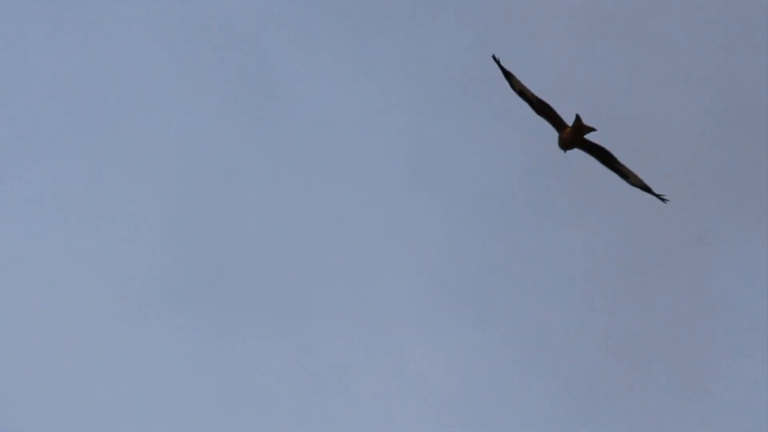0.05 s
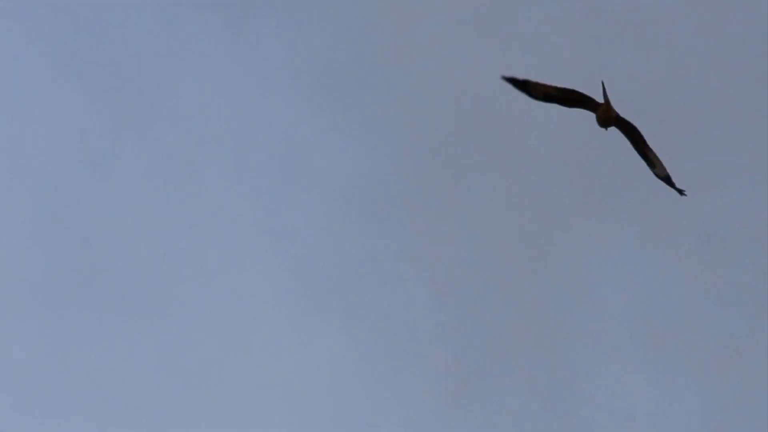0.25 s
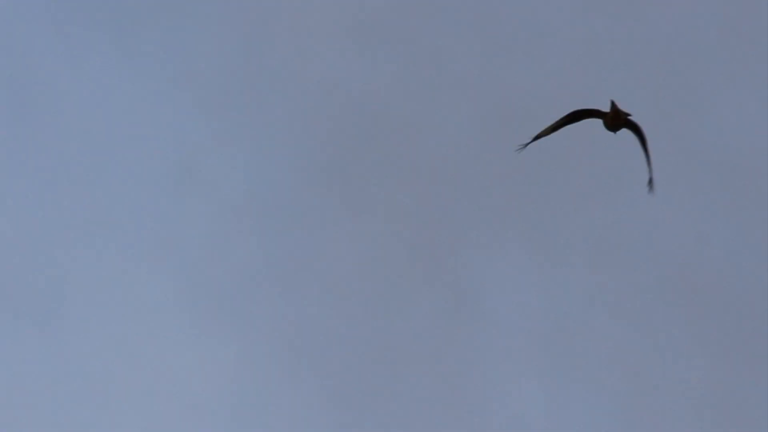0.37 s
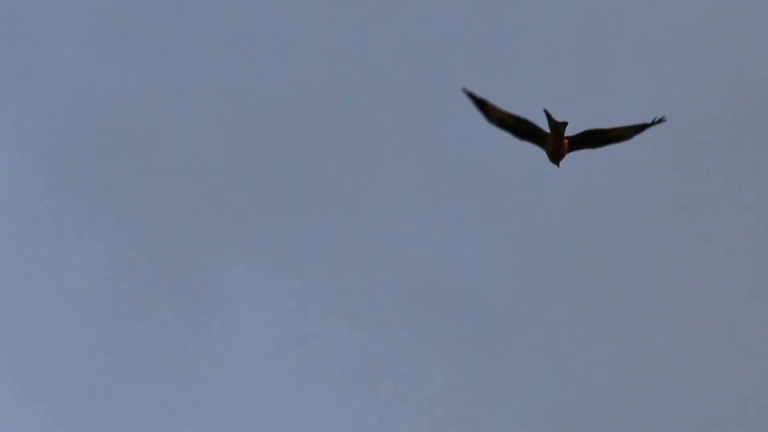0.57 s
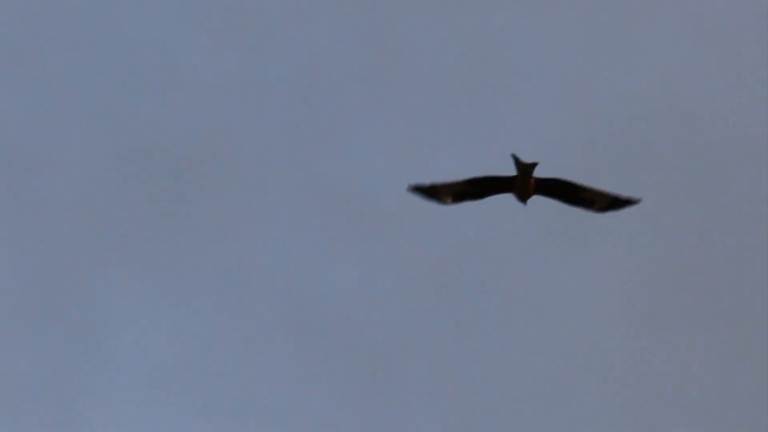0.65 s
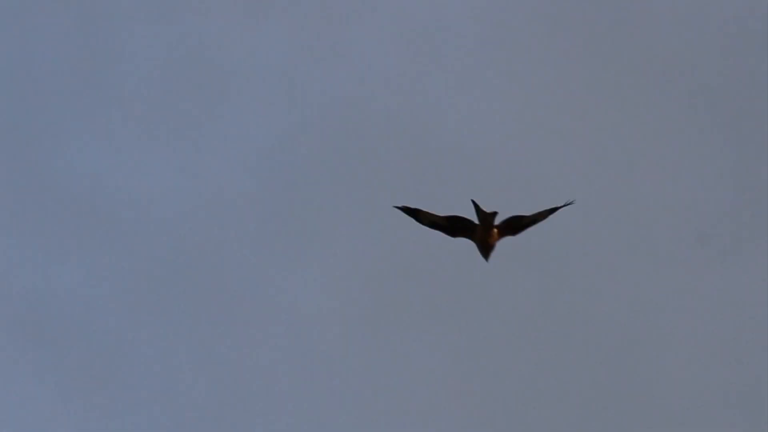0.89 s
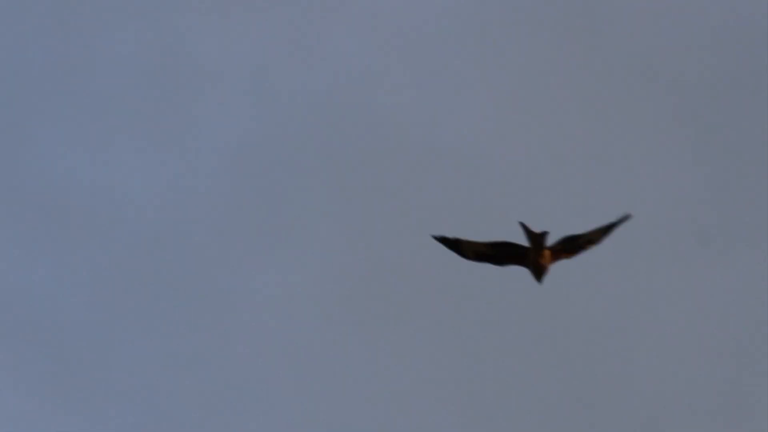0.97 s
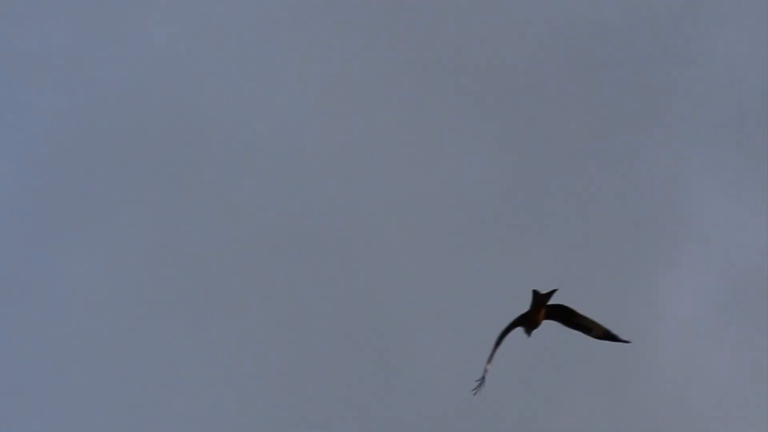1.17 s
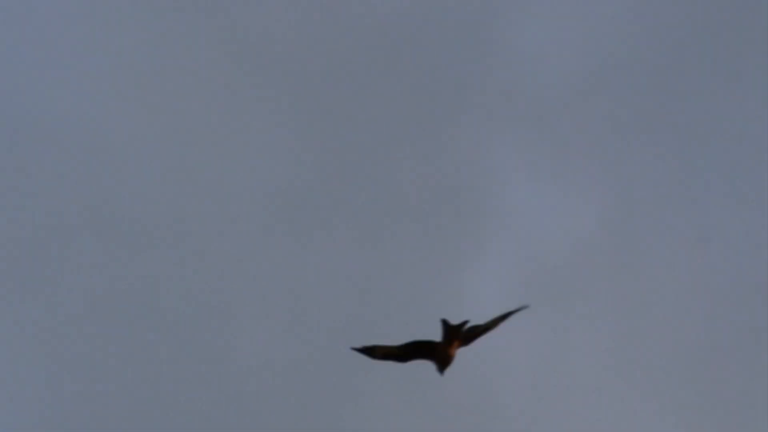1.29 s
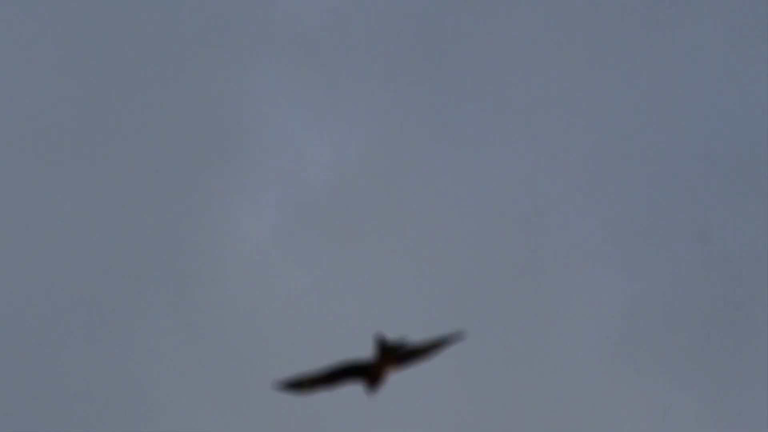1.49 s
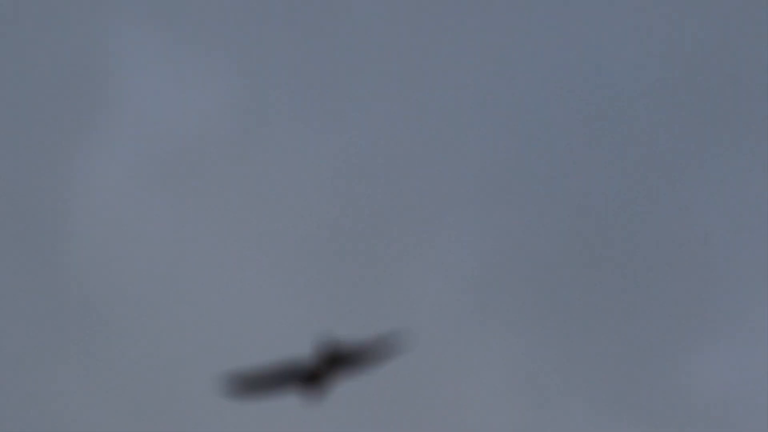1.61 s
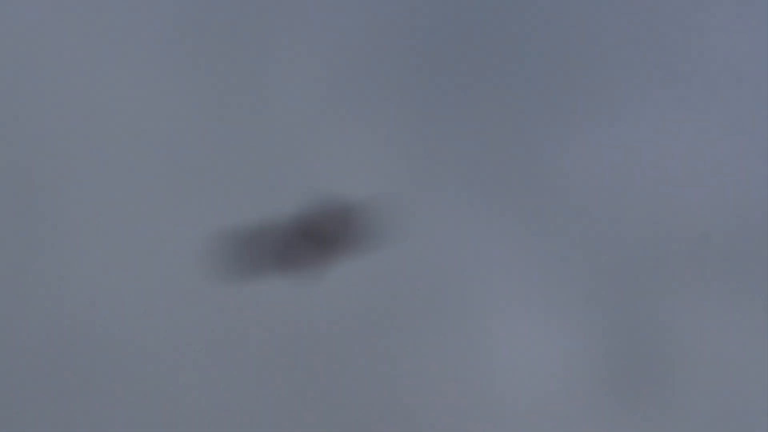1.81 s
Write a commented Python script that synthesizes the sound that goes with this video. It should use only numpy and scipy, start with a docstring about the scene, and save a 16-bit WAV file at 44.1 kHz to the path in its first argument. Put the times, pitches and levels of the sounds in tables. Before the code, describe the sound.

Gusty wind buffets the microphone, rumbling and thumping over a faint hiss of distant air.

```python
"""Gusty wind buffets a camera's microphones; stereo widening puts left and right largely in opposite phase.
Turbulence throbs and rumbles, then flutters and rasps as it hardens; single eddies thump.
Behind it distant air hisses and wind moans and whistles round an edge, with one soft brush and a tick.
The hardest buffets overload the recorder, whose gain control ducks the hiss and lets it swell back."""
import sys
import numpy as np
from scipy import signal
from scipy.fft import rfft, irfft
from scipy.io import wavfile
from scipy.ndimage import minimum_filter1d

SR = 44100
rng = np.random.default_rng(int(sys.argv[2]) if len(sys.argv) > 2 else 0)


def wrap_up_sound(samples):
    """Save the sound to the file named by the first command line argument, as 16-bit audio."""
    columns = np.atleast_2d(samples).T
    # keep every value between -1 and 1, then stretch to whole-number steps
    tamed = np.clip(columns, -1, 1)
    steps = np.round(tamed * 32767).astype(np.int16)
    wavfile.write(sys.argv[1], SR, steps)


N = 81585
TIME_S, BINS_HZ = np.arange(N) / SR, np.fft.rfftfreq(N, 1 / SR)
WIND_CORRELATION = -0.63  # stereo widening leaves the channels largely in opposite phase


def amp(db):
    """Decibels to gain."""
    return 10 ** (np.asarray(db) / 20)


def unit_rms(x):
    """Scales to rms 1."""
    return x / np.sqrt(np.mean(x ** 2) + 1e-20)


def over_hz(points):
    """Table value at each bin, interpolated in log frequency."""
    hz, value = np.transpose(points)
    return np.interp(np.log(BINS_HZ + 1), np.log(hz + 1), value)


def over_time(rows):
    """Table columns interpolated at each sample."""
    time_s, *columns = np.transpose(rows)
    return [np.interp(TIME_S, time_s, column) for column in columns]


def pan(left_minus_right_db):
    """Left and right gains."""
    return amp(np.array([[1], [-1]]) * left_minus_right_db / 2)


def blur(x, width_s):
    """Gaussian smoothing, sigma = width_s / pi."""
    return irfft(rfft(x) * np.exp(-2 * (BINS_HZ * width_s) ** 2), N)


def lag(x, tau_s):
    """One-pole follower."""
    pole = np.exp(-1 / (tau_s * SR))
    return signal.lfilter([1 - pole], [1, -pole], x)


def wander(width_s):
    """Smooth random curve, rms 1."""
    return unit_rms(blur(rng.standard_normal(N), width_s))


def noise(bin_gain, correlation):
    """Stereo noise of given spectrum and left-right correlation, rms 1."""
    left, independent = rfft(rng.standard_normal((2, N)))
    right = correlation * left + np.sqrt(1 - correlation ** 2) * independent
    return unit_rms(irfft(np.array([left, right]) * bin_gain, N))


def steadied(x, width_s=0.028):
    """Divides out a noise's slow chance swells."""
    power = blur((x ** 2).mean(0), width_s)
    return x / np.sqrt(abs(power) + 1e-9)


# Hiss spectrum: freq_hz, density_db
AIR_SPECTRUM = [(40, 1.5), (150, -9.5), (400, -7.5), (700, -13.5), (1100, -7.5), (1600, -8.5),
                (2400, -16.5), (3400, -16.5), (4500, -22.5), (7000, -28), (11000, -33), (16000, -39.5)]
# Hiss left-right likeness: freq_hz, correlation
AIR_CORRELATION = [(100, 0.98), (1300, 0.78), (3000, 0.25), (6000, 0.035), (15000, -0.23)]
# Hiss balance: freq_hz, pan_db
AIR_BALANCE = [(200, 2), (1200, 0.5), (2400, -1.5), (6000, -1.5), (15000, -1.5)]
def distant_air(level_db=-46):
    """Smooth hiss of wind far away."""
    bin_gain = amp(over_hz(AIR_SPECTRUM)) * pan(over_hz(AIR_BALANCE))
    return amp(level_db) * noise(bin_gain, over_hz(AIR_CORRELATION))


# Scuff spectrum: freq_hz, density_db
BRUSH_SPECTRUM = [(1000, -20), (3000, 5), (6000, 4), (10000, -7), (16000, -14)]
def brush(centre_s=0.531, half_width_s=0.013, level_db=-55.5, pan_db=-2):
    """A light touch scuffs the camera."""
    swell = np.exp(-((TIME_S - centre_s) / half_width_s) ** 2)
    return amp(level_db) * swell * noise(amp(over_hz(BRUSH_SPECTRUM)), correlation=0) * pan(pan_db)


# Modes of a small hard tick: freq_hz, level_db, t60_s
TICK_MODES = [(1740, -30, 0.028), (1880, -37.5, 0.035), (2360, -31, 0.01), (8540, -50, 0.0069)]
def tick(start_s=1.541, rise_s=0.0011):
    """A few modes ring and die quickly."""
    age_s = np.maximum(TIME_S - start_s, 0)
    ring = sum(amp(level_db - 60 * age_s / t60_s) * np.sin(2 * np.pi * freq_hz * age_s)
               for freq_hz, level_db, t60_s in TICK_MODES)
    return (1 - np.exp(-age_s / rise_s)) * ring


# Wind singing round an edge: time_s, pitch_hz, moan_db, whistle_db
EDGE_TONE = [(0, 1049, -55, -54.5), (.17, 1131, -49.5, -53.5), (.37, 1146, -52.5, -49.5),
             (.55, 1030, -51.5, -60), (.78, 1078, -51.5, -60), (.9, 1193, -43, -71), (.95, 1315, -43, -42),
             (1.04, 1403, -43, -40), (1.15, 1385, -39.5, -48.5), (1.27, 1371, -67, -55.5),
             (1.55, 1110, -69, -69), (1.7, 960, -65, -58), (1.79, 1002, -59, -47.5), (1.85, 1014, -49, -51)]
def edge_tone(moan_width_hz=376, whistle_width_hz=20.6, waver_db=3, correlation=0.91, pan_db=1.5):
    """A broad, wavering moan and a thin whistle glide together with the wind's speed."""
    pitch_hz, moan_db, whistle_db = over_time(EDGE_TONE)
    phase = 2 * np.pi * np.cumsum(pitch_hz) / SR
    moan_db += waver_db * wander(width_s=0.049)
    out = np.zeros((2, N))
    for width_hz, level_db in [(moan_width_hz, moan_db), (whistle_width_hz, whistle_db)]:
        band = 1 / (1 + (2 * BINS_HZ / width_hz) ** 2)
        tone = noise(band, correlation) * np.cos(phase) + noise(band, correlation) * np.sin(phase)
        out += amp(level_db) * steadied(tone)
    return out * pan(pan_db)


# Rasp spectrum, for spits and turbulence: freq_hz, density_db
RASP_SPECTRUM = [(300, -11.5), (650, 4.5), (1100, -12), (2100, -22.5), (3200, -37), (6000, -65.5)]
# Bursts of rasp: centre_s, level_db
SPIT_BURSTS = [(0.445, -34), (0.694, -35), (1.042, -21), (1.063, -11), (1.086, -6), (1.108, -12.5),
               (1.155, -22), (1.26, -33.5), (1.326, -24.5), (1.414, -33)]
def spits(half_width_s=0.0029, pan_db=8.5):
    """Flow tears off a microphone port for a few milliseconds, mostly on the left."""
    envelope = sum(amp(level_db) * np.exp(-((TIME_S - centre_s) / half_width_s) ** 2)
                   for centre_s, level_db in SPIT_BURSTS)
    return envelope * noise(amp(over_hz(RASP_SPECTRUM)), WIND_CORRELATION) * pan(pan_db)


# Eddies striking the ports: centre_s, level_db, pitch_hz, half_width_s, pan_db
EDDIES = [(0.111, -27, 117, 0.0083, -8), (.243, -19.5, 128, 0.0039, 11.5), (0.276, -25, 76.4, .011, -1),
          (.357, -14.5, 129, .005, 7.5), (.389, 3.5, 195, 0.0023, -6), (0.445, 1, 223, 0.0027, 2),
          (0.585, -5.5, 205, 0.0022, 6.5), (0.5989, 4, 163, .006, -6.5), (0.688, -18.5, 249, 0.0018, 0.5),
          (.713, -13.5, 99.5, 0.017, -16.5), (.797, -10.5, 216, 0.0022, 6.5), (0.863, -19, 118, 0.018, 0),
          (0.981, -13.5, 261.6, 0.0023, 4.5), (1.015, -16, 134, 0.0044, 7.5), (1.045, -.5, 260, .0042, 1),
          (1.064, 0, 380, .002, 6), (1.144, 1, 303, 0.0062, -2), (1.258, -1, 230, 0.0021, -5),
          (1.272, -0.5, 175, 0.0045, -0.5), (1.32, 1, 256, 0.0036, 1.5), (1.445, 2.5, 233.5, 0.0025, -1.5),
          (1.505, 3, 180, 0.003, 1.5), (1.69, -26, 89.3, 0.013, 8.5), (1.752, -28.5, 110.3, 0.0087, 8)]
def buffets(crossing_s=0.00029):
    """Each eddy is a short thump, slightly later and inverted in the right channel."""
    port_delay_s, polarity = np.array([[0], [crossing_s]]), np.array([[1], [-1]])
    out = np.zeros((2, N))
    for centre_s, level_db, pitch_hz, half_width_s, pan_db in EDDIES:
        offset_s = TIME_S - centre_s - port_delay_s
        swing = np.sin(2 * np.pi * pitch_hz * offset_s) * np.exp(-(offset_s / half_width_s) ** 2)
        out += amp(level_db) * swing * pan(pan_db) * polarity
    return out


# Turbulence spectra, low to high: freq_hz, density_db
THROB_SPECTRUM = [(15, -17.5), (30, -16), (60, 4), (110, -7.5), (170, -13.5), (300, -38), (600, -84)]
RUMBLE_SPECTRUM = [(20, -50), (50, -17.5), (100, -0.5), (160, 0.5), (260, -8), (400, -18), (700, -60),
                   (1400, -83)]
FLUTTER_SPECTRUM = [(80, -32.5), (200, -13), (340, 5), (560, -3.5), (780, -18), (1100, -24.5),
                    (2100, -66.5), (4000, -76)]
# Wind strength at the ports: time_s, rumble_db, flutter_db
GUSTS = [(0, -58.5, -45), (.085, -43.5, -67), (.11, -38, -64), (.2, -42.5, -62), (.25, -34.5, -55),
         (.29, -34.5, -87), (.375, -22, -42), (.398, -23.5, -17.5), (.425, -14.5, -49), (.45, -15, -30.5),
         (.49, -30.5, -57), (.53, -20, -52), (.585, -17, -38), (.604, -10.5, -7.5), (.625, -14.5, -41),
         (.68, -24, -37), (.70, -9, -27.5), (.755, -23.5, -42), (.795, -20, -37), (.825, -27, -48),
         (.96, -31.5, -52.5), (1.025, -14, -27.5), (1.053, -12, -11.5), (1.068, 3.5, -3.5),
         (1.095, -2.5, -1), (1.124, -14.5, -22.5), (1.15, -7, -8), (1.225, -11, -37), (1.262, -6, -22),
         (1.293, -19, -28.5), (1.32, -8.5, -18.5), (1.39, -12, -22), (1.425, -17, -28.5),
         (1.445, -13.5, -20.5), (1.505, -13, -19), (1.535, -17, -44.5), (1.585, -19.5, -46.5),
         (1.68, -37, -55), (1.85, -41.5, -56)]
def turbulence(lump_db=2.5):
    """Lumpy pressure on the ports: throb and rumble, then flutter and rasp as the wind hardens."""
    rumble_db, flutter_db = over_time(GUSTS)
    throb_db = 0.59 * rumble_db - 15.5  # grows slower than the rumble
    rasp_db = 2.2 * flutter_db - 7  # grows faster than the flutter
    lumps = amp(lump_db * wander(width_s=0.0083))

    def layer(spectrum, level_db, pan_db):
        band = lumps * noise(amp(over_hz(spectrum)), WIND_CORRELATION) * pan(pan_db)
        return amp(level_db) * steadied(band)

    return (layer(THROB_SPECTRUM, throb_db, pan_db=-1.5)
            + layer(RUMBLE_SPECTRUM, rumble_db, pan_db=-1.5)
            + layer(FLUTTER_SPECTRUM, flutter_db, pan_db=2)
            + layer(RASP_SPECTRUM, rasp_db, pan_db=8.5))


def scene():
    """Stereo sum of all sources."""
    return turbulence() + buffets() + spits() + distant_air() + edge_tone() + tick() + brush()


def gain_control(x, ceiling_db=-5.5, hold_s=0.041, react_s=0.002, recover_db_per_s=148.5):
    """Peaks over the ceiling duck both channels; the gain recovers quickly, then slowly."""
    over_db = np.maximum(20 * np.log10(abs(x).max(0) + 1e-9) - ceiling_db, 0)
    half_hold = int(hold_s * SR / 2)
    held_db = -minimum_filter1d(-over_db, 2 * half_hold + 1, origin=half_hold)  # trailing maximum
    ramp_db = recover_db_per_s * TIME_S
    released_db = np.maximum.accumulate(held_db + ramp_db) - ramp_db
    smoothed_db = lag(released_db, tau_s=0.0033)
    quick_db = np.interp(TIME_S - react_s, TIME_S, smoothed_db)
    slow_db = 1.17 * lag(quick_db, tau_s=0.56)
    return x / amp(np.maximum(quick_db, slow_db))


def overload(x, crossfeed=0.36, crackle_db=-47.5):
    """Clips with a faint crackle; the stereo widener carries the distortion to the other side."""
    clipped = np.clip(x, -1, 1)
    distortion = clipped - x
    crackle = amp(crackle_db) * rng.standard_normal((2, N)) * (abs(x).max(0) > 1)
    return clipped - crossfeed * distortion[::-1] + crackle


def record(dry):
    """Gain control, clipping, band limit."""
    cutoff_hz = 16100
    lowpass = signal.firwin(511, cutoff_hz, window=("kaiser", 9), fs=SR)
    return signal.oaconvolve(overload(gain_control(dry)), lowpass[None], "same")


dry = scene()
out = record(dry)
wrap_up_sound(out)
```